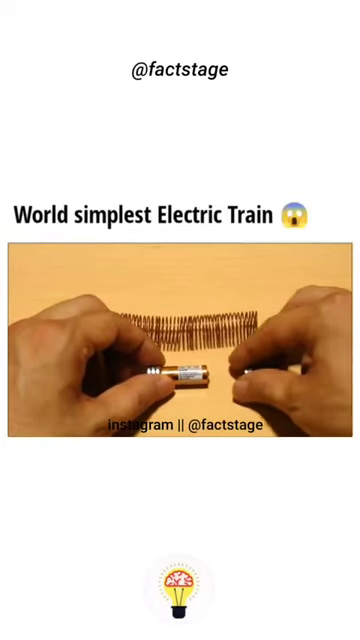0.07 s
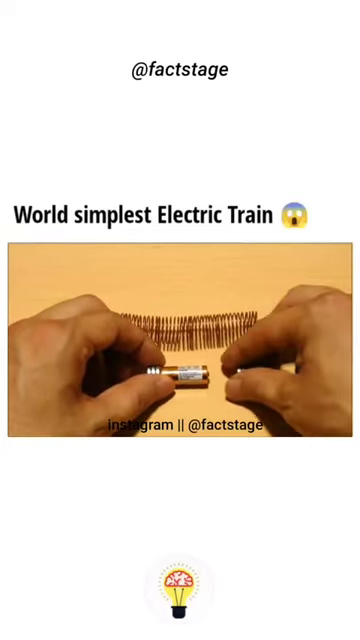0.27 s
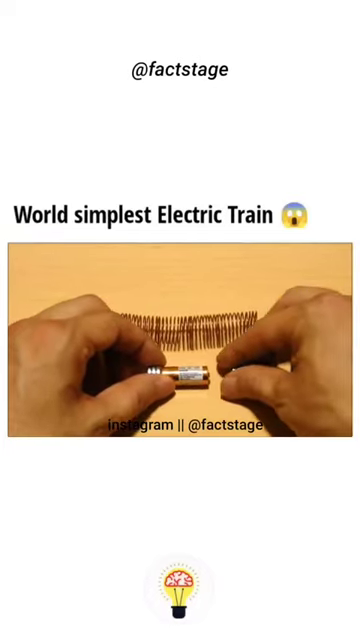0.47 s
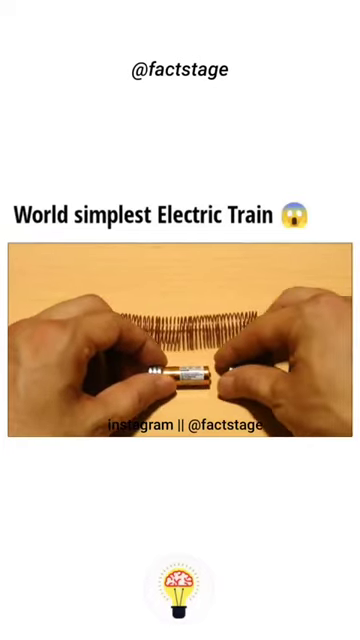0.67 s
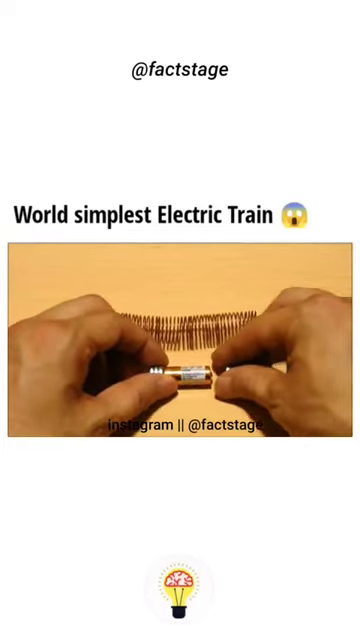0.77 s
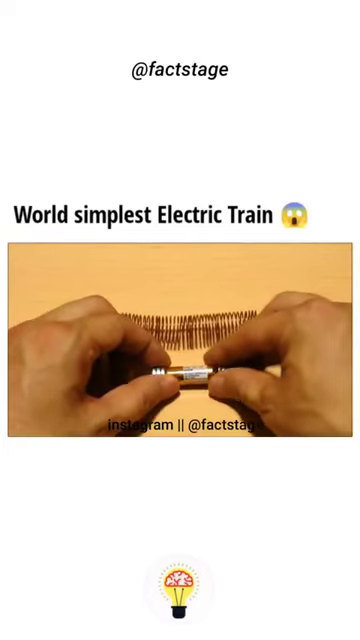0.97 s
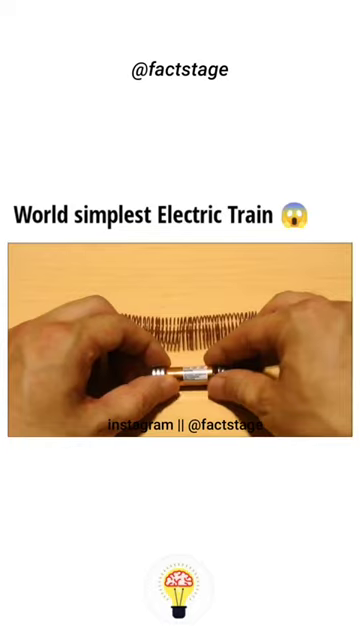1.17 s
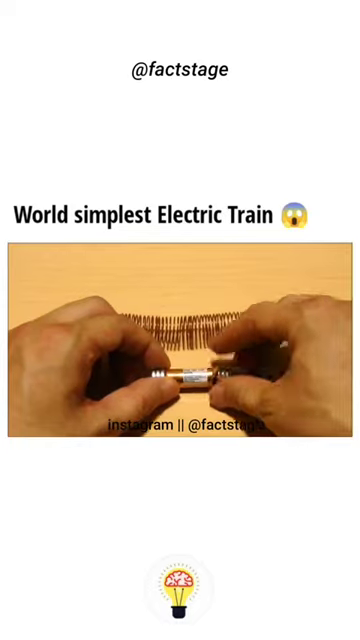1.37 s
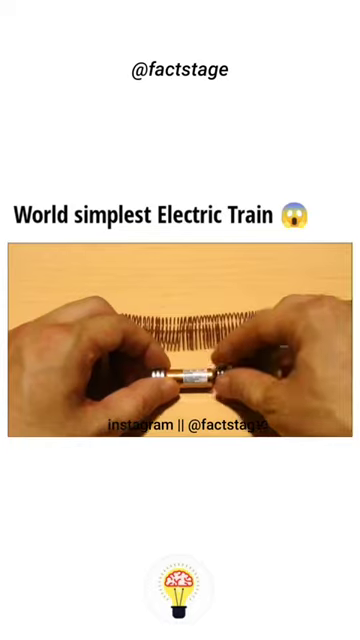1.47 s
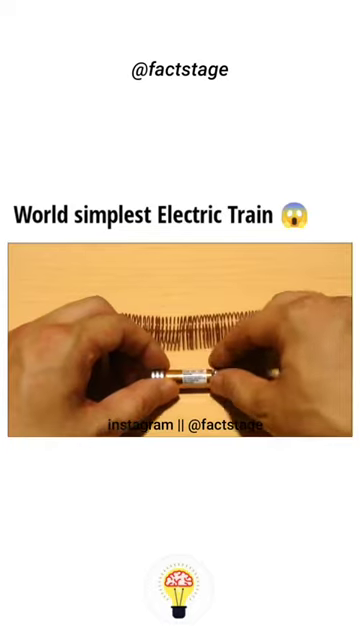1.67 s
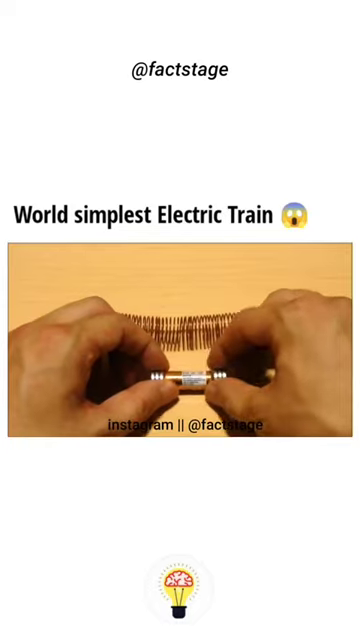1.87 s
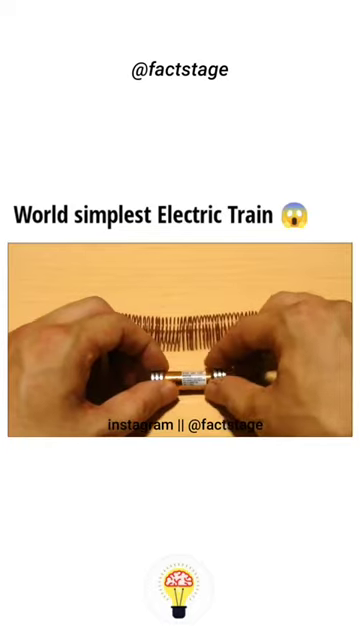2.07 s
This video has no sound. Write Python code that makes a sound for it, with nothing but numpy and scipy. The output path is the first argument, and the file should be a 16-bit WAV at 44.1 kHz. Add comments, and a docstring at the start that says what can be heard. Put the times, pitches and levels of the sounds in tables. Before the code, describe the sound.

A small magnet snaps onto a battery with one sharp click in a quiet room.

```python
"""Low rumble and soft finger scuffs, then one hard click: a small steel magnet jumps onto a battery.
The steel rings briefly, the battery can and magnet sing on, and the wooden table below thuds.
The small room rings for about a quarter of a second while the gain control dips and recovers.
Under it all sit a wavering hum, a faint fan-like whir and microphone hiss."""
import sys
import numpy as np
from scipy import signal
from scipy.io import wavfile
from scipy.ndimage import uniform_filter1d

SR = 44100
rng = np.random.default_rng(int(sys.argv[2]) if len(sys.argv) > 2 else 0)


def wav_out(sig):
    """Save sig, one row per channel (or a flat mono array), as 16-bit PCM at SR to the path in sys.argv[1]."""
    wavfile.write(sys.argv[1], SR, np.round(np.clip(np.atleast_2d(sig).T, -1, 1) * 32767).astype(np.int16))


N = 93183
SNAP_S, SNAP_DB = 1.19855, -2.6  # when the magnet lands, and the gain on all its layers

def gain_of(db):
    return 10 ** (np.asarray(db) / 20)

def unit_rms(x):
    return x / np.sqrt(np.mean(x ** 2) + 1e-20)

def curve_at(points, hz):
    freqs, values = np.transpose(points)
    return np.interp(np.log(hz + 1), np.log(freqs + 1), values)

def placed(start_s, sound):
    track = np.zeros(N)
    part = track[round(start_s * SR):][:len(sound)]
    part += sound[:len(part)]
    return track

def ring(modes, rise_s, top_hz=SR, quicken=0):
    """Dying sines after a blow, dulled above top_hz; quicken gives higher modes a faster attack."""
    t = np.arange(SR // 4) / SR
    out = np.zeros(len(t))
    for hz, db, t60 in modes:
        attack = 1 - np.exp(-t / rise_s * (hz / 5000) ** quicken)
        decay = gain_of(db - 60 * t / t60)
        out += attack * decay * np.sin(2 * np.pi * hz * t) / (1 + (hz / top_hz) ** 4)
    return out

# Steel-on-steel modes. Each row: pitch in Hz, relative level in dB, 60 dB decay time in seconds.
STEEL_MODES = [(2300, -4, 0.0058), (3330, -3, 0.0044), (4506, -8.5, 0.014), (5298, 6.5, 0.0059),
               (5677, -1.5, 0.018), (6594, 0, 0.0072), (7230, -6, 0.012), (8720, 0, 0.0061),
               (9450, 2.5, 0.0023), (10820, -15, 0.0026), (12170, -11, 0.009), (12300, -36, 0.0034)]
def steel_click():
    """The magnet hits the battery's end: bright modes that die almost at once."""
    steel = ring(STEEL_MODES, rise_s=0.00085, top_hz=SR * 2, quicken=2.6)
    return placed(SNAP_S, gain_of(SNAP_DB) * steel / abs(steel).max())

# Can and magnet modes. Each row: pitch in Hz, relative level in dB, 60 dB decay time in seconds.
CAN_MODES = [(1782, -20, 0.13), (1822, -24, 0.1), (2020, -30, .09), (2318, -28, .15), (2780, -24, 0.13),
             (3030, -27, 0.15), (3248, -26, 0.11)]
MAGNET_MODES = [(8510, -23.5, 0.11), (9480, -25, 0.2), (9572, -24.5, 0.31), (10640, -21, 0.05),
                (12100, -26.5, 0.1), (12770, -33.5, 0.21)]
def metal_ring():
    """The struck battery can rings on, with the magnet singing thin and high above it."""
    return placed(SNAP_S, gain_of(SNAP_DB) * ring(CAN_MODES + MAGNET_MODES, rise_s=0.0026))

# Table top modes. Each row: pitch in Hz, relative level in dB, 60 dB decay time in seconds.
WOOD_MODES = [(229, -21.5, 0.095), (308.5, -15, 0.045), (350, -19.5, 0.062), (524, -17, 0.069),
              (641, -21.5, 0.054), (827, -17.5, 0.031), (940, -28.5, 0.044), (1078, -38, 0.13),
              (1372, -33.5, 0.12)]
def table_thud():
    """The wooden top answers the blow with low modes and a softer attack."""
    return placed(SNAP_S, gain_of(SNAP_DB) * ring(WOOD_MODES, rise_s=0.0039))

# Early reflections. Each row: delay in seconds, level in dB, leftward pan in dB.
REFLECTIONS = [(.0018, -7, 0), (.009, -7, -1), (.0127, -10, 1), (.0137, -11, 0), (.0215, -14, 1),
               (.0243, -14, -1)]
def early_echoes(click):
    """Hands, table and walls throw back single copies, with the top treble rolled off."""
    dulled = signal.sosfilt(signal.butter(6, 12300, fs=SR, output="sos"), click)
    out = np.zeros((2, N))
    for k, (delay_s, db, pan_db) in enumerate(REFLECTIONS):
        sides = gain_of(db - pan_db * np.array([[1.5], [2.5]]))  # further left is also quieter
        out += (-1) ** k * sides * placed(delay_s, dulled)
    return out

# The room's decay. Each row: frequency in Hz, 60 dB decay time in seconds.
ROOM_DECAY = [(200, 0.14), (500, 0.38), (1200, 0.29), (2000, 0.32), (4000, 0.29), (6000, 0.32),
              (8500, 0.23), (12000, 0.28)]
# Its tone. Each row: frequency in Hz, relative level in dB.
ROOM_EQ = [(100, -16), (170, -11), (300, -3.5), (520, -9), (850, -7.5), (1400, -10), (1900, -1.5),
           (2700, -6), (4000, -0.5), (5500, -7), (7000, 0), (8700, 1), (10500, -0.5), (13100, -22.5),
           (13500, -31)]
# Its width. Each row: frequency in Hz, left-right likeness (1 is mono).
ROOM_LIKENESS = [(200, 0.24), (460, 1), (1000, 1), (1800, 1), (3500, 0.98), (7000, 0.93), (13000, 0.88)]
def room_reverb(send):
    """Dense reflections of random sign build up, then each band dies at its own speed."""
    taps = np.zeros((2, SR))
    arrivals = np.arange(128, SR - 16, 8) + rng.integers(0, 8, (2, (SR - 137) // 8))
    np.put_along_axis(taps, arrivals, rng.choice([-1., 1.], arrivals.shape), 1)
    hz, t, bands = signal.stft(taps, SR, nperseg=128)
    likeness = curve_at(ROOM_LIKENESS, hz)[:, None]
    bands[1] = likeness * bands[0] + np.sqrt(1 - likeness ** 2) * bands[1]
    bands *= gain_of(curve_at(ROOM_EQ, hz)[:, None] - 60 * t / curve_at(ROOM_DECAY, hz)[:, None])
    tail = signal.istft(bands, SR, nperseg=128)[1]
    tail *= 1 - np.exp(-(np.arange(tail.shape[1]) / SR / 0.0098) ** 2)  # blooms in about 10 ms
    return signal.fftconvolve(send[None], tail / np.linalg.norm(tail[0]), axes=1)[:, :N]

# Finger moves. Each row: start in seconds, length in seconds, level in dB, treble cutoff in Hz.
SCUFF_CUES = [(0.067, 0.021, -57, 330), (0.271, 0.031, -67.5, 298), (0.561, 0.061, -53.5, 2750),
              (1.124, 0.051, -61, 1210), (1.184, 0.018, -43, 2600), (1.52, 0.038, -57, 403),
              (1.779, 0.044, -58, 495), (1.867, 0.034, -54, 1610)]
# What they rub. Each row: pitch in Hz, relative level in dB, 60 dB decay time in seconds.
RUBBED_MODES = [(227, -9, 0.02), (353, -1, 0.016), (535, 2, 0.014), (700, -2, .012), (1000, -2, 0.01),
                (1405, 3, 0.013), (1850, 1, 0.011), (2300, -3, .006), (2800, -2, 0.006)]
def finger_scuffs():
    """A short fading run of tiny slips rings what the fingers touch; soft contact is dull."""
    out = np.zeros(N)
    for start_s, length_s, db, top_hz in SCUFF_CUES:
        slips = rng.standard_normal(SR // 10)
        progress = np.arange(len(slips)) / SR / length_s
        envelope = np.minimum(progress / 0.13, 1) * gain_of(-10 * progress) * (progress < 1)
        surface = ring(RUBBED_MODES, rise_s=0.00075, top_hz=top_hz)[:2048]
        rub = signal.oaconvolve(slips * envelope, surface)
        rms = np.sqrt(np.mean(rub[:round(length_s * SR)] ** 2))
        out += placed(start_s, gain_of(db) * rub / rms)
    return out

# Rumble and hiss. Each row: frequency in Hz, relative level in dB.
BED_EQ = [(12, -25), (20, -19.5), (53, 6.5), (105, -6.5), (150, -7.5), (238, -10.5), (389, -19.5),
          (458, -21), (635, -15.5), (880, -26), (1400, -21.5), (1650, -37.5), (3530, -17.5), (9670, -24),
          (12000, -25), (13100, -28), (13500, -62)]
# Fan-like peaks. Each row: centre in Hz, width in Hz, boost in dB.
WHIR_PEAKS = [(510, 33, 6.5), (624, 24, 15.5), (794.7, 41, 20), (1110, 30, 8.5), (1205, 45, 5),
              (1391, 38, 14.5)]
# The bed's width. Each row: frequency in Hz, left-right likeness (1 is mono).
BED_LIKENESS = [(60, 0.71), (110, 0.72), (200, 0.83), (360, 0.45), (670, 0.72), (1210, 1), (2210, 0.33),
                (4040, 0.16), (7370, 0.27), (13400, 0.11)]
# Its balance. Each row: frequency in Hz, leftward pan in dB.
BED_PAN = [(60, 3), (230, 2), (900, 1.5), (3480, 0), (13400, 0.0)]
# Its patchy drift and quick flicker. Each row: frequency in Hz, depth in dB.
DRIFT_DEPTH = [(60, 0.94), (500, 0.89), (1500, 1.6), (2300, 4), (3300, 1.4), (5000, 1.3), (12000, 2)]
FLICKER_DEPTH = [(300, 1.5), (1500, 1), (4000, .8), (12000, 1.2)]
def noise_bed(level_db=-54):
    """Rumble, whir and microphone hiss: noise whose bands drift apart and flicker together."""
    frames, hz = N // 256 + 5, np.fft.rfftfreq(1024, 1 / SR)
    left_re, left_im, other_re, other_im, drift = rng.standard_normal((frames, 513, 5)).T
    drift = uniform_filter1d(drift, size=8, axis=0)  # smooth across frequency, then time
    drift = unit_rms(uniform_filter1d(drift, size=10, axis=1))
    flicker = unit_rms(uniform_filter1d(rng.standard_normal(frames), size=3))
    motion_db = curve_at(DRIFT_DEPTH, hz)[:, None] * drift
    motion_db += np.outer(curve_at(FLICKER_DEPTH, hz), flicker)
    whir_db = sum(db / (1 + ((hz - centre) / (width / 2)) ** 2) for centre, width, db in WHIR_PEAKS)
    tone_db = curve_at(BED_EQ, hz) + whir_db
    pan_db = np.outer([.5, -.5], curve_at(BED_PAN, hz))
    likeness = curve_at(BED_LIKENESS, hz)[:, None]
    left = left_re + 1j * left_im
    right = likeness * left + np.sqrt(1 - likeness ** 2) * (other_re + 1j * other_im)
    bands = np.array([left, right]) * gain_of(tone_db[:, None] + motion_db + pan_db[:, :, None])
    return gain_of(level_db) * unit_rms(signal.istft(bands, nperseg=1024, noverlap=768)[1][:, :N])

# Low resonances. Each row: centre in Hz, width in Hz, level in dB.
HUM_BANDS = [(58, 8.3, -60.5), (100.2, 13, -60.5)]
def low_hum():
    """Noise through narrow resonances gives a wavering hum."""
    out = np.zeros(N)
    for hz, width_hz, db in HUM_BANDS:
        band = signal.lfilter(*signal.iirpeak(hz, hz / width_hz, SR), rng.standard_normal(N))
        out += gain_of(db) * unit_rms(band)
    return out

def scene():
    """The close sounds and their reverb, over the noise bed and hum."""
    click, body, scuffs = steel_click(), metal_ring() + table_thud(), finger_scuffs()
    click_pan = gain_of([[2.5], [-2.5]])  # leans left
    close = click_pan * click + early_echoes(click) + body + scuffs
    crack = placed(SNAP_S, [gain_of(SNAP_DB + 9.5)])  # broadband spike, heard only as reverb
    send = crack + gain_of(-11) * (click + scuffs) + gain_of(-14) * body
    return close + gain_of(2.5) * room_reverb(send) + noise_bed() + low_hum()

def record(dry):
    """Gain control dips after the click and recovers; then microphone bass roll-off and a treble cut."""
    threshold_db, release_db_per_s = -37.0, 53.0
    power = uniform_filter1d((dry ** 2).mean(0), size=400, origin=199)
    power_db = 10 * np.log10(abs(power) + 1e-12)
    release_db = np.arange(N) * release_db_per_s / SR
    held_db = np.maximum.accumulate(power_db + release_db) - release_db
    over_db = np.maximum(held_db - threshold_db, 0)
    ducked = dry / gain_of(0.15 * uniform_filter1d(over_db, size=200, origin=99))
    low_cut = signal.butter(2, 37.4, "high", fs=SR, output="sos")
    high_cut = signal.firwin(401, 13900, window=("kaiser", 9), fs=SR)
    return signal.oaconvolve(signal.sosfilt(low_cut, ducked), high_cut[None], "same")

dry = scene()
out = record(dry)
wav_out(out)
```